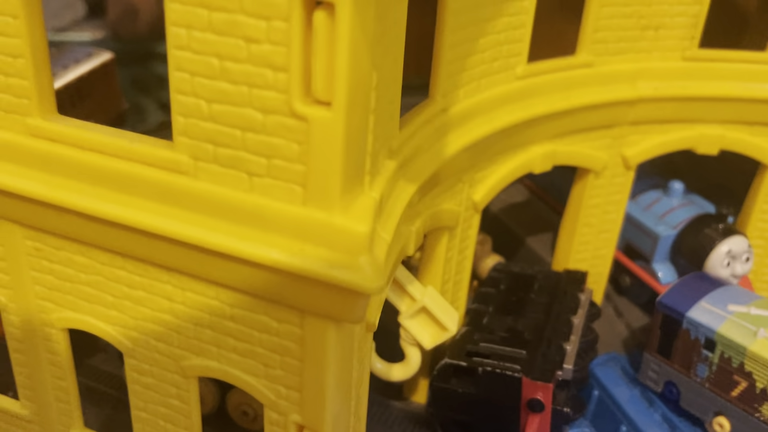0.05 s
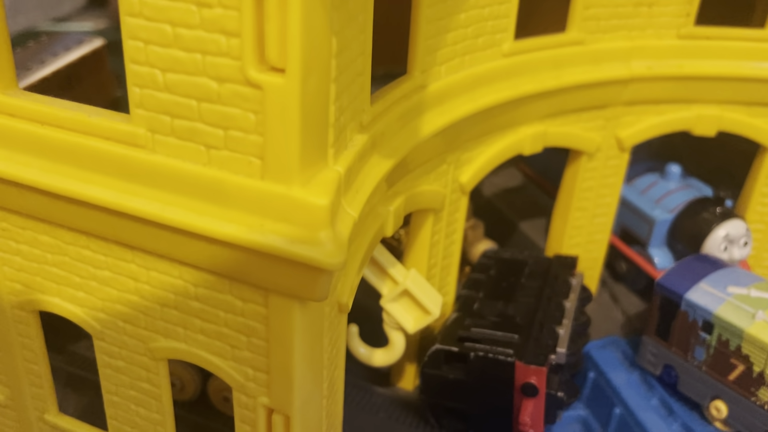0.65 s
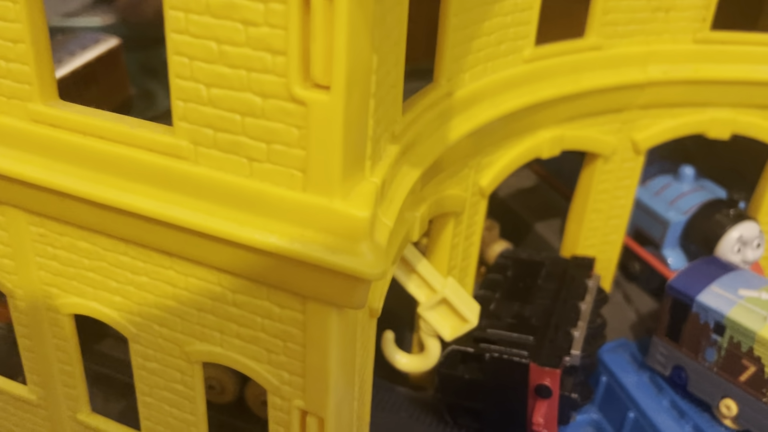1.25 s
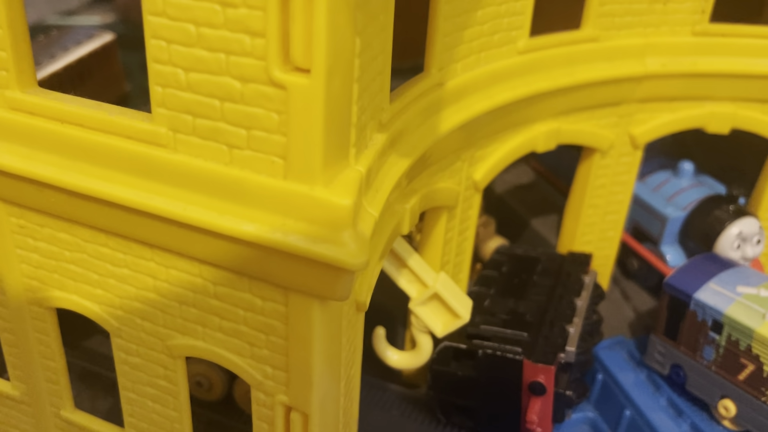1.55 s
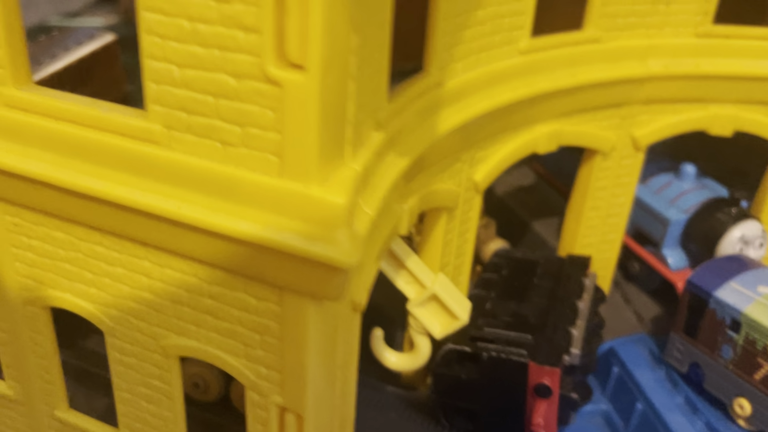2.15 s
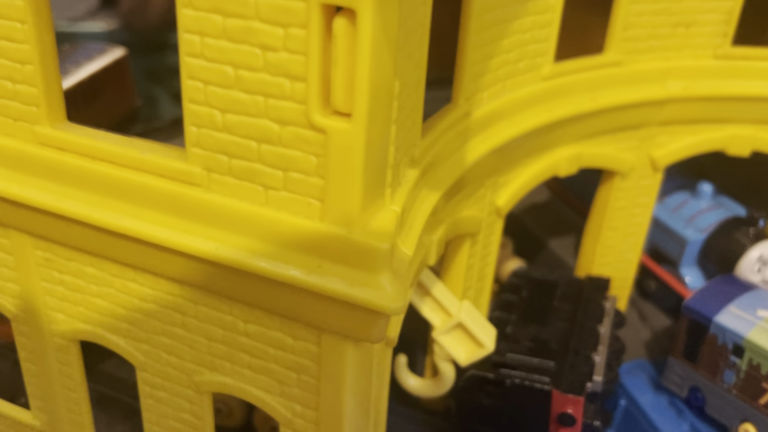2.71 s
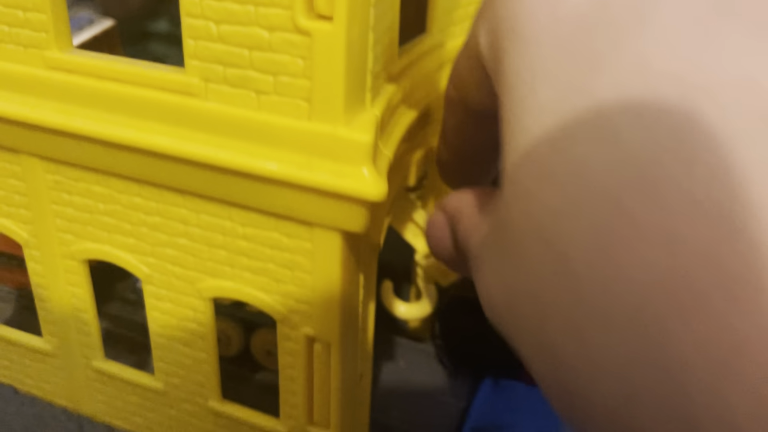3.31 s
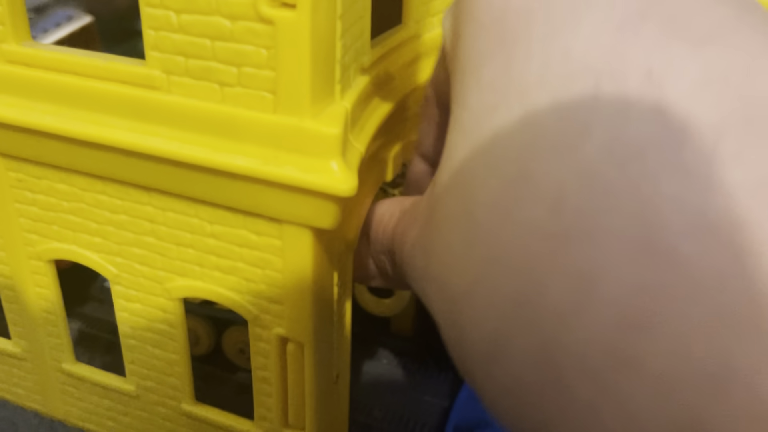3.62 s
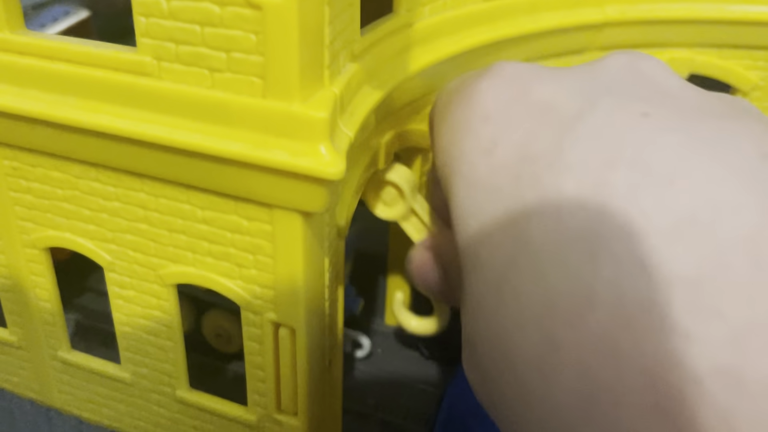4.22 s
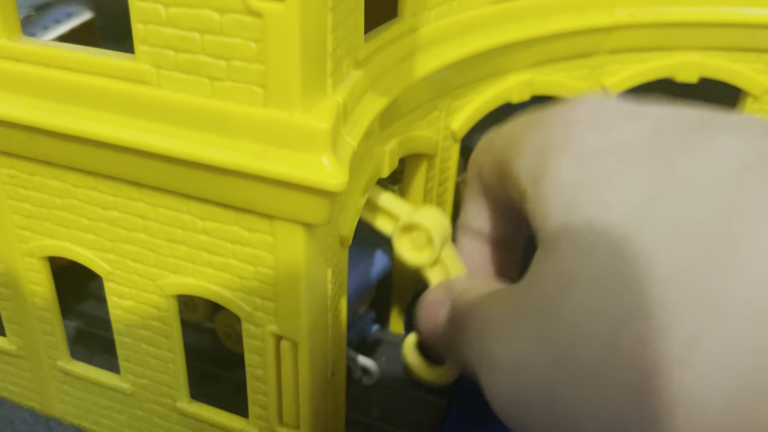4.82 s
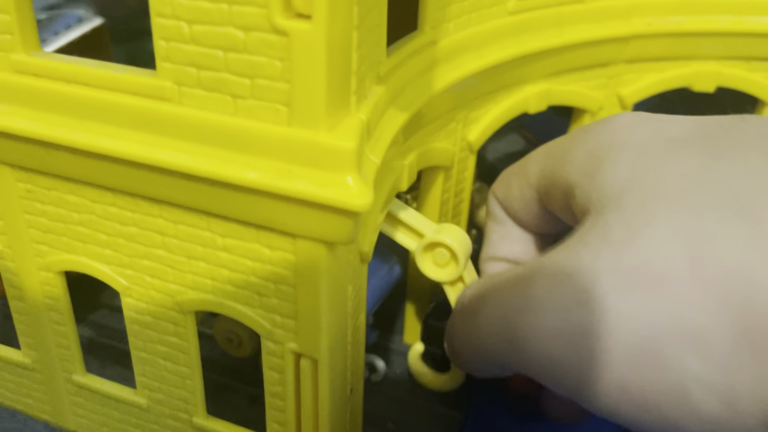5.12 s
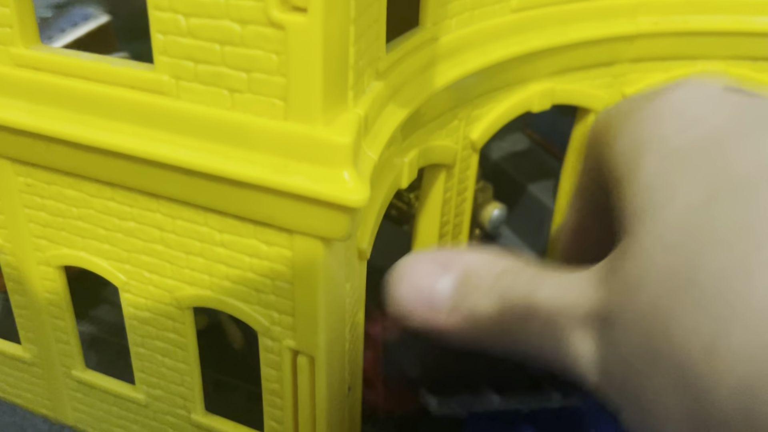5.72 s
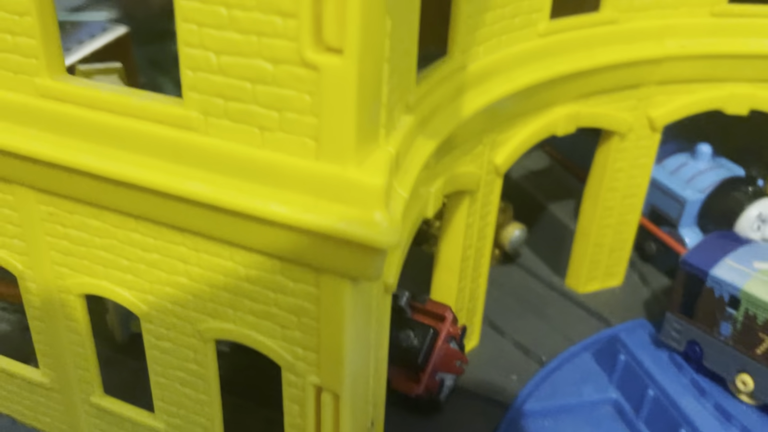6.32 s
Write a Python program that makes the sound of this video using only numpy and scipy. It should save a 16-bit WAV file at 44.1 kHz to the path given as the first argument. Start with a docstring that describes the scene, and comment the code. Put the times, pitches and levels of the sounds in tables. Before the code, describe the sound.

Close, uneven scrapes, clicks and hollow knocks of plastic toy trains being moved by hand in a toy shed, in a small quiet room.

```python
"""Hard plastic toy trains are pushed, lifted and set down inside a hollow plastic engine shed, heard close.
The pieces scrape in tiny stick-slip catches, knock and click, and a finger brushes over the plastic twice.
Every contact rings the shed's walls, and a few parts ping on their own.
A small quiet room answers with a short tail over a steady low rumble."""
import sys
import numpy as np
from scipy import signal
from scipy.fft import rfft, irfft, next_fast_len
from scipy.io import wavfile
from scipy.ndimage import uniform_filter1d

SR = 44100
rng = np.random.default_rng(int(sys.argv[2]) if len(sys.argv) > 2 else 0)


def store_pcm(level_fs):
    """Save levels as 16-bit WAV."""
    pcm = np.round(np.clip(level_fs, -1, 1) * 32767).astype(np.int16)
    wavfile.write(sys.argv[1], SR, np.atleast_2d(pcm).T)


N = 288855

# the four bands of a contact: (thud [Hz], body [Hz], clack [Hz], tick [Hz])
CONTACT_BANDS_HZ = [250, 900, 2500, 8000]


def gain_of(db):
    """Decibels to amplitude."""
    return 10 ** (np.asarray(db) / 20)


def unit_rms(x):
    """Scales to rms 1."""
    return x / np.sqrt(np.mean(x ** 2) + 1e-20)


def curve_at(points, hz, column=1):
    """One column of a table, joined by lines over log frequency."""
    columns = np.transpose(points)
    return np.interp(np.log(hz + 1), np.log(columns[0] + 1), columns[column])


def add(mix, start, sound):
    """Mixes a sound in at a start time in seconds."""
    part = mix[:, max(round(start * SR), 0):][:, :sound.shape[-1]]
    part += sound[..., :part.shape[1]]


def through(x, response):
    """Convolves both channels with a response."""
    return signal.oaconvolve(np.atleast_2d(x), np.atleast_2d(response), axes=1)[:, :N]


def eq(points, size=2048):
    """Minimum-phase response through (frequency [Hz], gain [dB]) points: no sound ahead of its onset."""
    hz = abs(np.fft.fftfreq(size, 1 / SR))
    log_gain = np.log(gain_of(curve_at(points, hz)))
    return np.fft.ifft(np.exp(np.conj(signal.hilbert(log_gain)))).real[:size // 2]


def contact(t60, note_hz, snap, note_db, rise_s=0.00056, treble_life=0.56, side_modes=5, size=4096):
    """One hit on thin moulded plastic: a snap, a dense ring, a few clear modes. Rows: shared, diffuse."""
    t = np.arange(size) / SR
    decay = gain_of(-60 * t / t60)
    noise = rng.standard_normal((2, size)) * (1 - np.exp(-t / rise_s))  # vibration takes time to spread
    low = signal.lfilter(*signal.butter(1, 6300, fs=SR), noise)
    ring = low * decay + (noise - low) * decay ** (1 / treble_life)  # plastic damps the treble first
    mode_hz = note_hz * np.r_[1, 2 ** rng.uniform(-1, 1, side_modes)]
    mode_db = note_db + np.r_[0, rng.standard_normal(side_modes) - 7]
    weight = gain_of(mode_db) * np.sqrt(mode_hz / SR)  # modes stand equally far out of their own bands
    phase = 2 * np.pi * mode_hz[:, None] * t
    wall_shift = 2 * np.pi * rng.random((len(mode_hz), 1))  # by way of the walls, in any phase
    ring[0] += weight @ np.cos(phase) * decay
    ring[1] += weight @ np.cos(phase + wall_shift) * decay
    ring[0, 0] += snap
    return ring


def hand_pressure(t, swell_s=0.036, sag_db=6, release_db_per_s=308):
    """Rumble, rubbing and hiss in dB: a light touch, plus pushes that swell, ease and let go."""
    # the hand keeps the pieces lightly in touch: (time [s], force [dB], edge hiss [dB re force])
    touches = [(0, -41, -3), (.37, -71.5, -24), (.56, -44, -3.5), (.84, -53, -15), (1.21, -31.5, 2.5),
               (1.33, -47, -9), (1.52, -59, -15), (1.83, -54, -7), (2.08, -46, -9.5), (2.15, -47.5, -10),
               (2.31, -41.5, 7), (2.71, -53, -2.5), (2.929, -72.5, 0), (3.479, -74, -6), (3.53, -50, -7),
               (3.8, -46.5, 2), (4.27, -45, -1), (4.35, -49, -8), (4.47, -47.5, 1.5), (4.97, -36, 1),
               (5.07, -44, -0.5), (5.42, -33.5, 1), (6.121, -25.5, -1), (6.249, -53.5, -10),
               (6.44, -58, -9.5), (6.53, -86.5, -6.5)]
    # (start [s], length [s], force [dB], wall rumble [dB re force], edge hiss [dB re force])
    pushes = [(-.03, 0.06, -38.5, 8.5, 7), (0.176, 0.095, -45.5, 6, -10), (.41, 0.069, -39.5, 0, -15.5),
              (0.611, 0.12, -27.5, 4.5, 2.5), (0.915, 0.074, -10.5, 3.5, 7.5), (0.988, 0.15, -25, -4, 8.5),
              (1.663, 0.082, -48, -4, -11), (1.838, 0.15, -34.5, 4, -2.5), (1.963, .095, -24, 5, 2.5),
              (2.168, 0.074, -19, 7.5, 6), (3.886, 0.13, -28.5, -6, -7.5), (4.127, 0.1, -21, -2, 1.5),
              (4.383, 0.082, -40.5, 13, 18.5), (4.609, 0.14, -32, -38, 1.5), (4.756, 0.15, -28, 4, -1),
              (5.125, .13, -35, 12, 0.5), (5.238, 0.061, -14, -3, -5), (5.301, 0.047, -6.5, -8, -0.5),
              (5.488, .04, -22.5, 3.5, -3), (5.578, 0.027, -13, 0.5, -13.5), (5.637, 0.11, -27.5, 0, 7),
              (5.735, 0.088, -15.5, 6.5, 4), (5.842, 0.16, -9.5, 0, -1), (5.999, .08, -15, 7, -0.5)]
    times, *columns = np.transpose(touches)
    touch_db, hiss_db = (np.interp(t, times, column) for column in columns)
    stir_db = touch_db + 4 - 0.25 * hiss_db  # the less a touch hisses, the more it stirs the walls
    power = gain_of([stir_db, touch_db, touch_db + hiss_db]) ** 2
    for start, length, force_db, rumble_db, hiss_db in pushes:
        age = t - start
        fall_db = sag_db * np.clip(age / length, 0, 1) + release_db_per_s * np.maximum(age - length, 0)
        push = np.clip(age / swell_s, 0, 1) ** 2 * gain_of(force_db - fall_db)
        power += (push * gain_of([[rumble_db], [0], [hiss_db]])) ** 2
    return 10 * np.log10(power)


def stick_slip(force_db, t, slips_per_s=450, spots_per_s=28, spots=24, ring_t60=0.029):
    """Tiny uneven catches; the touching point wanders over spots, each with its own colour and note."""
    grip = np.clip((force_db + 54) / 28, .13, 1)  # a light grip ticks, a firm one scrapes
    slipping = rng.random(N) < grip * slips_per_s / SR
    catches = slipping * gain_of(2 * np.minimum(rng.exponential(1, N), 3.5))
    # the hand's force limits how much slips at once
    catches /= np.sqrt(abs(uniform_filter1d(catches ** 2, size=1500)) + 1e-9)
    spot = (t * spots_per_s + 3 * rng.random(N)).astype(int) % spots
    grains = np.zeros((2, N))
    for k, note_hz in enumerate(rng.permutation(np.geomspace(550, 6500, spots))):
        band_db = rng.uniform(-11.2, 3.5, len(CONTACT_BANDS_HZ))
        colour = eq(list(zip(CONTACT_BANDS_HZ, band_db)))
        grain = through(contact(ring_t60, note_hz, snap=2.1, note_db=4), colour)
        grains += through(catches * (spot == k), grain)
    grit = np.clip((force_db + 70) / 18, 0, .97)  # the very lightest touch only hisses
    return grit * unit_rms(grains) + np.sqrt(1 - grit ** 2) * rng.standard_normal((2, N))


def slides():
    """Pieces are dragged along: the force sets the level, the surfaces set rumble and hiss."""
    # crossfade corners: (rumble below [Hz], rubbing from [Hz], rubbing to [Hz], hiss above [Hz])
    corners_hz = [260, 700, 2400, 6000]
    size = next_fast_len(N)
    hz, t = np.fft.rfftfreq(size, 1 / SR), np.arange(N) / SR
    coarse_t = t[::32]
    rumble_db, force_db, hiss_db = (np.interp(t, coarse_t, db) for db in hand_pressure(coarse_t))
    scrape = rfft(stick_slip(force_db, t), size)
    out = np.zeros((2, N))
    for shares, db in [([1, 0, 0, 0], rumble_db), ([0, 1, 1, 0], force_db), ([0, 0, 0, 1], hiss_db)]:
        band = curve_at(list(zip(corners_hz, shares)), hz)
        out += gain_of(db) * irfft(scrape * band, size)[:, :N]
    return out


def room_tone(level_db=-61.5):
    """The steady low rumble and faint hiss of the room."""
    # the room at rest: (frequency [Hz], gain [dB])
    colour = [(25, -14.5), (55, 1.5), (125, -18), (300, -24), (1400, -40), (3000, -48), (7000, -45.5),
              (15500, -56)]
    return gain_of(level_db) * unit_rms(through(rng.standard_normal((2, N)), eq(colour, size=8192)))


def knocks(t60_at_1khz=0.075):
    """Pieces hit the shed and each other; harder edges are brighter, small pieces ring high and short."""
    # (time [s], strength [dB], wall thud [dB re strength], brightness [dB re strength], note [Hz])
    hits = [(0.421, -38, 7, 8, 614), (.4995, -21, 1.5, -8.5, 555), (.6224, -12, -9.5, -19.5, 1047),
            (0.7612, -29, -2, 5, 793), (0.8458, -30.5, -17.5, 6.5, 1020), (0.9587, -12, -12.5, 19, 1800),
            (0.9745, -1.5, -14.5, -5.5, 1040), (1.0622, -13.5, -23.5, 13, 2756),
            (1.151, -25, 11.5, 16, 1044), (1.2161, -22.5, -20, 5.5, 2710), (1.273, -27, -6, -5, 2760),
            (1.6716, -36.5, 5.5, 5.5, 730), (1.8633, -19.5, -11, -12, 453), (1.8727, -11.5, -7.5, -19, 940),
            (1.9165, -32.5, -3.5, 2, 1080), (2.0379, -25, -6.5, 4, 2550), (2.1738, -19, -8.5, -3, 3680),
            (2.191, -16.5, -3.5, 10.5, 5163), (2.2317, -13.5, -5.5, 6, 2662), (2.2506, -23, 6, 18, 2510),
            (2.4433, -27, -15, -6, 1930), (2.673, -37.5, 1.5, -4.5, 684), (3.5165, -34, -4.5, -4, 645),
            (3.6034, -29, -12, -18.5, 1257), (3.7022, -25, -7.5, -2, 4530), (3.7714, -21.5, -24, -9, 4450),
            (3.8859, -19.5, -12, -9.5, 2010), (3.9331, -16, 1.5, -6, 693), (4.038, -25, -4, -2, 1313),
            (4.1715, -14, -13.5, -18, 1047), (4.404, -17.5, -9, -16, 505), (4.514, -32, -7, 3, 1214),
            (4.7122, -13, -6, 0, 2290), (4.7705, -13, 2, -11.5, 1870), (4.849, -21.5, -9.5, 2.5, 1227),
            (4.8891, -19.5, -15, -9, 1235), (5.0139, -23.5, -18.5, -14.5, 1120),
            (5.09, -26.5, -1.5, -32, 880), (5.2653, -14.5, -2.5, -24.5, 490), (5.3, 5, -1, -6, 935),
            (5.3092, -4.5, -4.5, 3, 1851), (5.332, -2.5, -18, -7, 897), (5.4945, 3, -14, -13, 1055),
            (5.498, -3.5, 0.5, -4, 432), (5.594, -4.5, -15.5, 7.5, 2590), (5.6048, 0.5, 8, 4, 1082),
            (5.6394, -4, -7.5, -2.5, 1953), (5.7631, -2, 0.5, 0.5, 284), (5.8821, -8, 9, -4, 299),
            (5.889, 2, -13.5, -3, 714), (5.9625, -1.5, -1.5, -3, 442), (6.0359, -21.5, 9.5, 6, 1674),
            (6.2095, -28, 0, -12, 647), (6.2956, -33, -14, -16, 549), (6.3711, -36, -1.5, -23, 603)]
    out = np.zeros((2, N))
    for start, db, thud_db, bright_db, note_hz in hits:
        clack_db = 2.5 + 0.59 * bright_db
        colour = eq(list(zip(CONTACT_BANDS_HZ, [thud_db, 0, clack_db, bright_db])))
        t60 = t60_at_1khz * (note_hz / 1000) ** -.15
        add(out, start, gain_of(db) * through(contact(t60, note_hz, snap=3.2, note_db=2), colour))
    return out


def pings():
    """Parts ring briefly on one note, from the booming floor to small loose fittings."""
    # ringing parts: (time [s], pitch [Hz], level [dB], t60 [s])
    notes = [(.425, 730, -53, 0.2), (.622, 1040, -26.5, 0.043), (1.03, 1700, -22.5, 0.16),
             (1.675, 750, -56, 0.34), (2.2, 125, -39.5, 0.16), (2.231, 166.6, -30, 0.26),
             (2.886, 1700, -57.5, 0.05), (3.89, 4490, -33.5, 0.026), (4.166, 84, -42.5, 0.3),
             (4.775, 92, -41, 0.13), (5.301, 335, -11, 0.064), (5.496, 425, -9.5, 0.058),
             (5.56, 1807, -20.5, 0.084), (5.558, 2060, -25.5, 0.049), (6.3, 620, -63, 0.49)]
    out, t = np.zeros((2, N)), np.arange(SR // 4) / SR
    for start, hz, db, t60 in notes:
        phase = 2 * np.pi * hz * t
        add(out, start, gain_of(db - 60 * t / t60) * np.array([np.sin(phase), np.cos(phase)]))
    return out


def clicks(t60=0.037):
    """The hook, couplings and thin edges snap together: short and bright, each on its own note."""
    # thin parts meeting: (time [s], strength [dB], note [Hz])
    snaps = [(1.166, -17, 4740), (1.377, -26.5, 4754), (2.0516, -6, 4360), (2.3133, -9.5, 3460),
             (2.3633, -13, 4780), (2.399, -13, 4750), (2.6132, -27.5, 6500), (3.6524, -28.5, 4540),
             (3.7842, -23.5, 4510), (4.1547, -9, 4870), (4.44, -25, 7730), (4.5396, -16.5, 3400),
             (4.6113, -16, 5640), (4.6729, -5.5, 5770), (4.727, -5.5, 6180), (4.796, -6, 5990),
             (5.1149, -16, 6110), (5.23, -7.5, 5380), (5.751, -1, 6460), (6.0385, 4, 7500),
             (6.1627, -20, 4680)]
    # their bright colour: (frequency [Hz], gain [dB])
    thin_edge = [(250, -30), (900, -15.5), (2500, -10), (8000, -2), (15000, -3.5)]
    out, colour = np.zeros((2, N)), eq(thin_edge)
    for start, db, note_hz in snaps:
        add(out, start, gain_of(db) * through(contact(t60, note_hz, snap=1.7, note_db=0.5), colour))
    return out


def finger_brushes(skew=1.22):
    """Skin glides over smooth plastic without catching: a soft, high swell that peaks late."""
    # passes of the finger: (start [s], length [s], level [dB])
    glides = [(2.88, 0.21, -61), (3.284, .21, -52)]
    # the airy colour of skin on plastic: (frequency [Hz], gain [dB])
    skin = [(200, -29), (1500, -7), (4500, 1), (9000, 2), (15000, -2)]
    out, colour = np.zeros((2, N)), eq(skin)
    for start, length, db in glides:
        swell = np.sin(np.pi * np.linspace(0, 1, round(length * SR)) ** skew)
        add(out, start, gain_of(db) * through(swell * rng.standard_normal((2, len(swell))), colour))
    return out


def shed(x, size=8192):
    """Contacts take the colour of hard plastic and ring the hollow walls."""
    # a contact on hard plastic: (frequency [Hz], gain [dB])
    plastic = [(40, -38.5), (100, -6), (170, -9.5), (450, -3.5), (1100, -2), (1400, -7), (2100, -9),
               (3000, -14.5), (3800, -17), (7500, -16), (10000, -21.5), (13000, -29.5), (15500, -27)]
    # wall resonances: (frequency [Hz], width [Hz], level [dB re contact colour])
    wall_modes = [(159, 19, 6), (209.8, 84, 0), (342, 22, -1.5), (450, 34, -10.5), (643, 75, -10.5),
                  (760.4, 56, -7), (957, 81, -14.5), (1116, 150, -13.5), (1723, 21, -4.5),
                  (2630, 200, -0.5), (4490, 77, -1.5), (4780, 350, -2.5), (5320, 92, -2.5)]
    t = np.arange(size) / SR
    walls = np.zeros(size)
    for hz, width, db in wall_modes:
        decay = np.exp(-np.pi * width * t)
        walls += gain_of(db) * 2 * np.pi * width / SR * decay * np.cos(2 * np.pi * hz * t)
    walls[0] += 1  # the contact itself
    return through(x, np.convolve(walls, eq(plastic)))


def room(x, wet_db=-14, build_s=0.01, soft_hz=5000):
    """A small furnished room: a diffuse tail in which each band dies at its own speed."""
    # reverb times: (frequency [Hz], t60 [s])
    decay_times = [(150, 0.37), (1000, 0.17), (8000, 0.14), (15000, 0.062)]
    hz, t, noise = signal.stft(rng.standard_normal((2, SR // 2)), SR, nperseg=256)
    decay = gain_of(-60 * t / curve_at(decay_times, hz)[:, None])
    tail = signal.istft(noise * decay, SR, nperseg=256)[1]
    tail *= np.minimum(np.arange(tail.shape[1]) / SR / build_s, 1) ** 2
    tail /= np.linalg.norm(tail[0])
    tail = signal.lfilter(*signal.butter(1, soft_hz, fs=SR), tail)  # soft furnishings swallow the treble
    return x + gain_of(wet_db) * through(x, tail)


def stereo_width(x):
    """Left and right share part of the sound, phase and level varying by frequency; the rest is diffuse."""
    # stereo image: (frequency [Hz], likeness [0-1], left lead [rad], left over right [dB])
    image = [(162, 0.96, 0.5, -0.5), (350, 1, 0.95, -1.5), (600, 0.8, 0.4, 3.5), (1000, 0, 0.78, -4),
             (1400, 0.7, -3, 2.5), (2268, 0.1, 1, 3), (2450, .6, 2.35, -1), (3000, 0.8, -0.32, 0),
             (4800, 0.8, 1.65, 2.5), (5700, 0.7, 2.5, -1.5), (6900, 1, 0.64, -5), (7970, 1, 2, -1.5),
             (13800, .93, 10, -0.5), (15500, .92, 13.5, -3.5)]
    size = next_fast_len(N + SR // 10)
    hz = np.fft.rfftfreq(size, 1 / SR)
    shared, diffuse = rfft(x, size)
    likeness = np.clip(curve_at(image, hz, column=1), 0, 1)
    lead = curve_at(image, hz, column=2)
    lean = gain_of(curve_at(image, hz, column=3) / 2)
    right = (likeness * shared + np.sqrt(1 - likeness ** 2) * diffuse) * np.exp(-1j * lead)
    return irfft(np.array([shared * lean, right / lean]), size)[:, :N]


def placed(x, top_hz=10200):
    """The piece's place leans the sound to one side; the top octave opens when no wall is in the way."""
    # where the handled piece is: (time [s], left over right [dB], top octave [dB])
    path = [(0, 2, 2.5), (0.749, -1, 0.5), (1.2, 0, 0), (2.298, 0, 1.5), (3.699, 2, 13), (4.4, 0.5, 11.5),
            (5.3, 0, 2.5), (6.201, 1, 6.5)]
    times, *columns = np.transpose(path)
    lean_db, top_db = (np.interp(np.arange(N) / SR, times, column) for column in columns)
    top = signal.filtfilt(*signal.butter(2, top_hz, "highpass", fs=SR), x)
    return (x + (gain_of(top_db) - 1) * top) * gain_of([lean_db / 2, -lean_db / 2])


def scene(slide_db=-1):
    """Contacts sound through the shed, join the pings in the room and sit on the room tone."""
    contacts = knocks() + clicks() + gain_of(slide_db) * slides() + finger_brushes()
    toys = room(shed(contacts) + pings())
    return placed(stereo_width(toys)) + stereo_width(room_tone())


def record(dry, cutoff_hz=15900):
    """Soft clipping rounds off the loudest peaks; a steep low-pass trims the very top."""
    rounded = dry / (1 + dry ** 4) ** .25
    lowpass = signal.firwin(511, cutoff_hz, window=("kaiser", 9), fs=SR)
    return signal.oaconvolve(rounded, lowpass[None], "same")


dry = scene()
out = record(dry)
store_pcm(out)
```